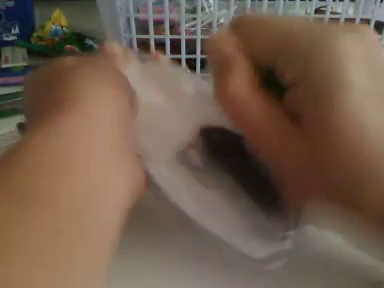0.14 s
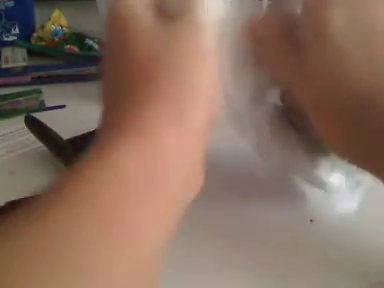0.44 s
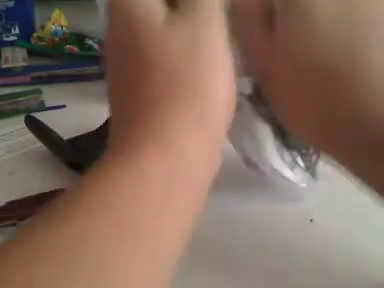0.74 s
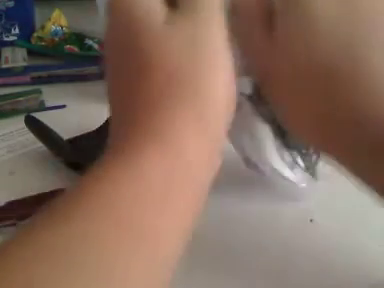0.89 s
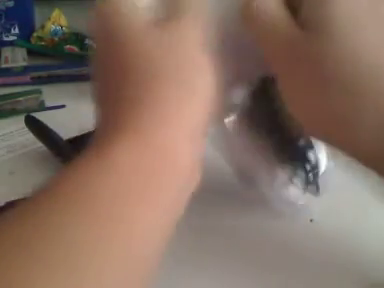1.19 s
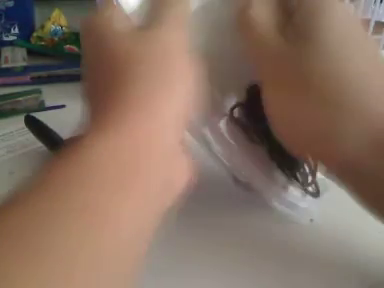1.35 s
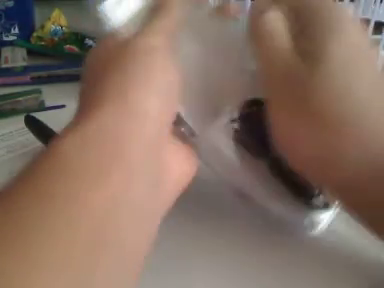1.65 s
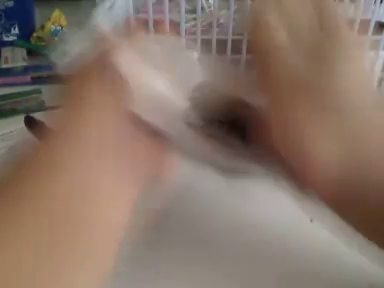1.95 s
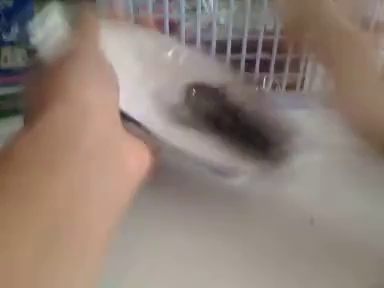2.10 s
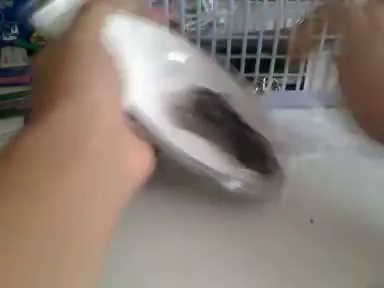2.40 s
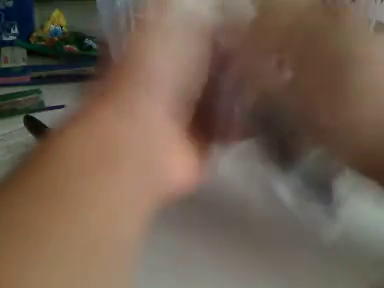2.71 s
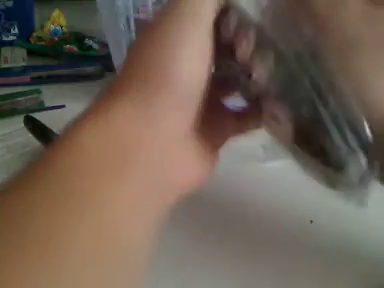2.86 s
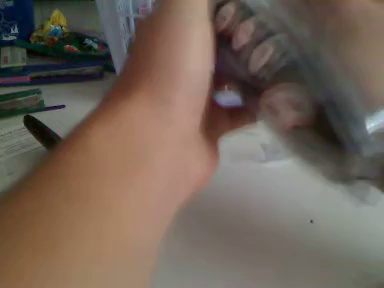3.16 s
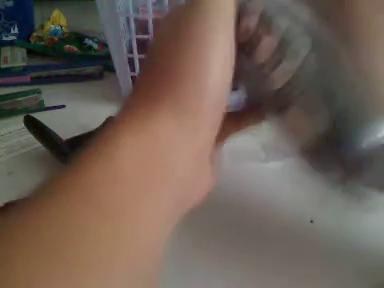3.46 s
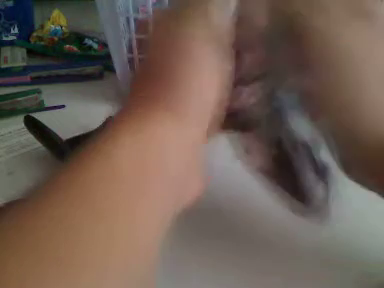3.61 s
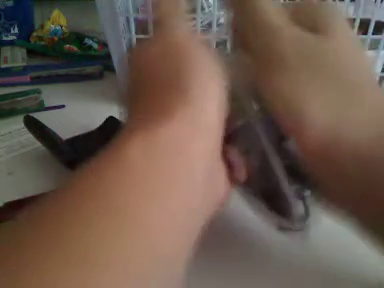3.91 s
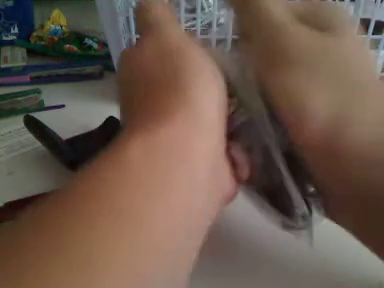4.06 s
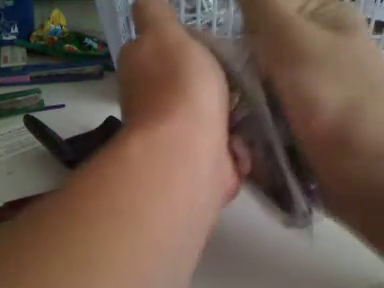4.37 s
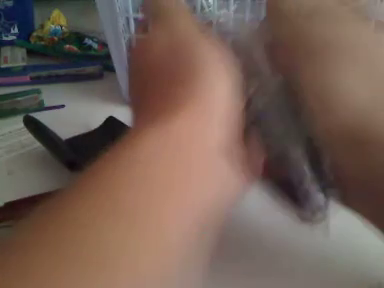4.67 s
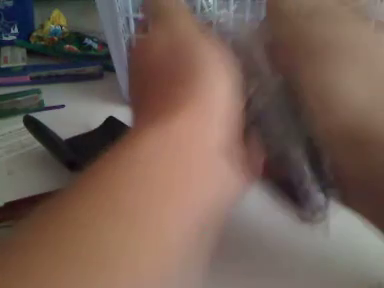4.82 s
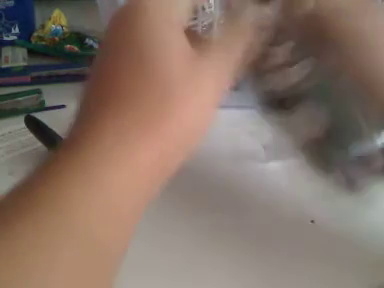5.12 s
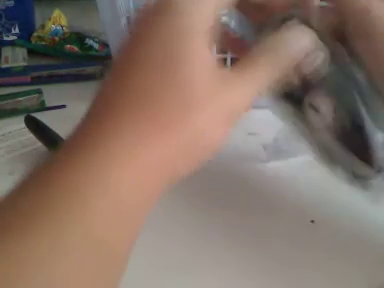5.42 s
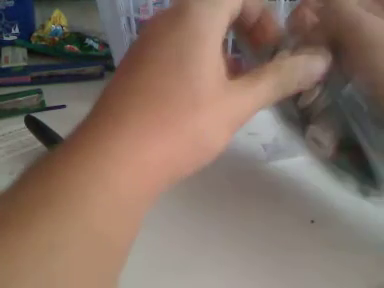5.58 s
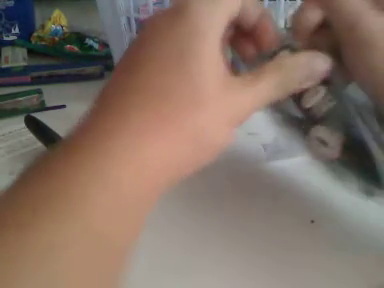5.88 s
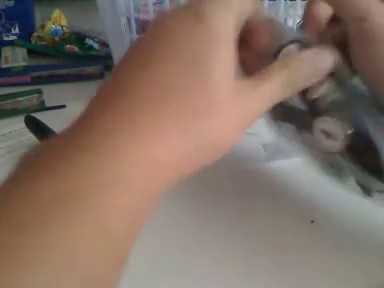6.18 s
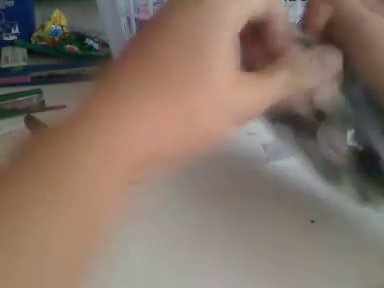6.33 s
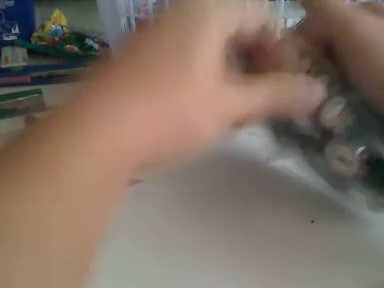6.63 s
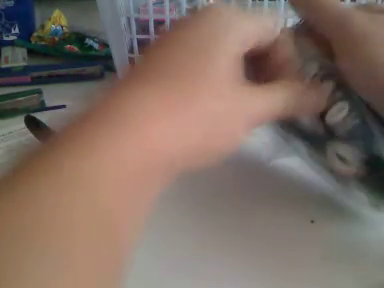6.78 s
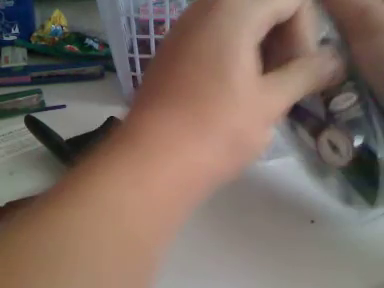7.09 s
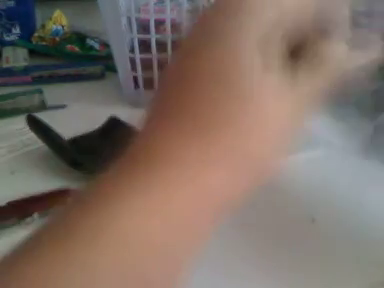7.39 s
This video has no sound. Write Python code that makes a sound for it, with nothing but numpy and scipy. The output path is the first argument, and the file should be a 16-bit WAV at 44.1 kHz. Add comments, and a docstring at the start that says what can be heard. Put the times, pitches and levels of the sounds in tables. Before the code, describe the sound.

Stiff plastic packaging is bent and pulled by hand, with sharp snaps, crinkling and rubbing fingers, close up in a small room.

```python
"""Hands bend and pull apart a stiff clear blister pack over a desk in a small room. First the sheet buckles in
a run of snaps; the hard one at 2.3 s overloads the recorder, which passes nothing above about 4 kHz. Then, for
two seconds, only creases tick, fingers rub and skid, and the plastic crinkles. From 4.5 s softer snaps join in
again, until a second hard one overloads the recorder at 7.1 s. All along, the hollow shell and the room ring
briefly, over a low rumble of the hands and a faint hiss."""
import sys
import numpy as np
from scipy import signal
from scipy.fft import rfft, irfft
from scipy.io import wavfile
from scipy.ndimage import uniform_filter1d

SR = 44100
rng = np.random.default_rng(int(sys.argv[2]) if len(sys.argv) > 2 else 0)


def bounce(signal):
    """Save signal as a 16-bit WAV file at the path given by the first command-line argument."""
    frames = np.transpose(np.atleast_2d(signal))
    limited = np.clip(frames, -1, 1)
    pcm = np.round(limited * 32767).astype(np.int16)
    wavfile.write(sys.argv[1], SR, pcm)


N = 326369

# A panel flips, jolts the hands and rings in four pitch ranges, each of which adds its own gain:
# (time [s], jolt [dB], thump [dB], panel pitch [Hz], panel [dB], rib pitch [Hz], rib [dB],
#  crease pitch [Hz], crease [dB], part sent into the room [dB])
SNAPS = [(0.2772, -64, -25, 972, -21, 1025, -27.5, 2520, -29.5, -2.5),
         (0.561, -49, -27, 500, -47, 1036, -34, 3430, -35.5, -3.5),
         (0.82, -46.5, -41, 865, -42.5, 1625, -41, 3120, -40, 1),
         (1.0913, -63, -56, 900, -52, 1070, -48, 2460, -42, -0.5),
         (1.7389, -60.5, -31, 813, -27.5, 1650, -39.5, 2850, -45, -4),
         (1.7976, -54, -48, 960, -52, 1074, -25.5, 3316, -33, -4.5),
         (2.268, -30.5, -25, 732, -11.5, 1455, -19, 2853, -20.5, -1),
         (4.5259, -63, -52.5, 513, -38.5, 1507, -42, 2380, -44, -0.5),
         (4.6423, -50, -58, 499, -37, 1453, -46.5, 2280, -38.5, 2.5),
         (5.2284, -51, -36.5, 542, -32, 1070, -32, 2100, -41.5, -1),
         (5.6424, -57, -52, 830, -40, 1120, -51, 2560, -48, -0.5),
         (6.0543, -64, -76, 876, -41.5, 1526, -46.5, 3250, -47, 0),
         (6.3357, -59.5, -51, 873, -34, 1075, -50.5, 2050, -50.5, -2.5),
         (6.7368, -60, -63, 807, -38.5, 1145, -50, 2260, -41.5, 0.5),
         (6.8096, -53.5, -35, 464, -40.5, 1560, -46, 2150, -47.5, -0.5),
         (7.0962, -34.5, -30, 605, -15.5, 1689, -23.5, 3560, -19.5, -1),
         (7.3199, -51.5, -53, 794, -32.5, 1070, -39.5, 3440, -35, -4.5)]
# The pack's four pitch ranges: thump, panel, rib and crease. A mode is one pitch it likes to ring at.
# (low edge [Hz], high edge [Hz], base fade time [s], base share of the main mode [0-1], gain [dB])
PITCH_RANGES = [(177, 450, .0022, 0.2, -2.5), (450, 1000, 0.0032, .75, 2), (1000, 1900, 0.0029, 0.5, 5.5),
                (2000, 3900, 0.0019, 0.3, 2.5)]
# Small creases give way: (time [s], base level [dB], brightness [dB])
TICKS = [(0.033, -59, -0.5), (0.139, -60, -1), (0.201, -45.5, -10), (0.25, -43, -26), (0.388, -57, -2),
         (0.442, -55.5, -2), (0.57, -38, -10), (0.816, -48.5, 2.5), (1.051, -53.5, 0), (1.238, -52.5, -24),
         (1.573, -49, -21), (1.675, -46.5, -23), (1.911, -50, -16), (2.056, -47.5, -35),
         (2.517, -55.5, -5.5), (2.757, -42.5, -3), (2.803, -52, -3), (2.867, -43.5, 9.5), (2.928, -43, 4.5),
         (3.028, -46, -5), (3.249, -53, -6.5), (3.286, -48.5, -10), (3.348, -50, -5.5), (3.39, -47.5, 1),
         (3.448, -51.5, 0), (3.479, -47, -7), (3.579, -52.5, -7), (3.693, -51.5, -14.5), (3.761, -52, -20),
         (3.983, -44, 2.5), (4.21, -53.5, -7), (4.233, -45, -1.5), (4.383, -52.5, -3), (4.486, -47, -8.5),
         (4.897, -55, 2.5), (5.104, -55, -4), (5.175, -46, 0), (5.565, -47, -13), (5.609, -46.5, -3.5),
         (5.844, -45.5, -2), (5.964, -46.5, -11), (5.995, -61, 7), (6.057, -42, -4.5), (6.17, -51, -16.5),
         (6.426, -44, -8.5), (6.522, -59.5, 15), (6.794, -48.5, -14)]
# The hands take hold, bend the sheet and let go:
# (start [s], length [s], base rub [dB], base flex [dB], base crinkle [dB], bent sheet's resonance [Hz])
MOVES = [(0.0, 0.092, -60, -61.5, -55.5, 830), (0.371, 0.13, -55.5, -56, -57.5, 920),
         (0.533, 0.093, -49, -44.5, -47, 950), (0.672, 0.35, -60, -56, -56, 1000),
         (1.076, .2, -57.5, -58.5, -56, 1130), (1.473, 0.3, -56.5, -53.5, -63, 787),
         (1.899, 0.17, -55, -52, -73, 870), (2.399, 0.14, -57, -58, -64.5, 800),
         (2.724, 0.25, -56, -54, -49, 977), (3.136, 0.069, -62.5, -60.5, -58.5, 830),
         (3.264, 0.27, -60, -58.5, -56.5, 780), (3.568, 0.069, -57.5, -57.5, -59.5, 665),
         (3.819, 0.24, -55.5, -57.5, -54.5, 820), (4.192, 0.087, -60, -53, -54, 870),
         (4.513, 0.24, -58, -59, -56.5, 570), (4.752, 0.089, -63.5, -63, -55, 682),
         (4.9, 0.16, -62.5, -77, -62.5, 596), (5.159, .17, -51.5, -52.5, -48, 635),
         (5.396, .15, -56.5, -53, -55, 780), (5.632, 0.056, -49.5, -55, -50.5, 780),
         (5.737, 0.12, -56, -54.5, -53, 620), (5.937, 0.086, -58, -54, -49.5, 685),
         (6.046, 0.11, -55, -51.5, -49, 720), (6.341, 0.19, -59.5, -54.5, -51.5, 757),
         (6.717, 0.17, -54, -53, -52.5, 680), (6.937, .13, -54.5, -54.5, -51.5, 631),
         (7.15, 0.3, -53.5, -59.5, -61, 750)]
# Tone colours of rubbing fingers, flexing sheet and fine crinkle: (frequency [Hz], relative level [dB])
RUB_COLOUR = [(60, -15.5), (130, -7.5), (300, -3.5), (460, 2.5), (600, 1), (1000, -20.5)]
FLEX_COLOUR = [(350, -21.5), (520, -11.5), (800, 6), (1000, -2), (1250, -8), (1650, -2), (2200, -24)]
CRINKLE_COLOUR = [(1100, -28), (1750, 6), (2400, 5), (3000, 0.5), (3700, -6.5), (4300, 1)]
# A finger or an edge skids along the sheet: (start [s], length [s], resonance [Hz], level [dB])
SKIDS = [(0.868, 0.063, 1120, -44), (0.878, 0.052, 2600, -49), (1.1, 0.029, 1210, -45),
         (1.147, 0.035, 1250, -51), (1.351, 0.052, 320, -55), (1.474, 0.11, 322, -54),
         (1.751, 0.023, 450, -48.5), (1.978, 0.046, 1160, -53), (2.072, 0.04, 597, -53.5),
         (3.037, 0.024, 800, -52), (3.91, 0.055, 730, -53), (3.971, 0.046, 869, -46.5),
         (5.235, 0.042, 2080, -49), (5.763, 0.074, 595, -53), (6.082, 0.04, 660, -45),
         (6.47, 0.025, 598, -48), (7.355, 0.05, 478, -52)]
# Modes of the hollow shell: (pitch [Hz], gain [dB], time to fade by 60 dB [s])
SHELL_MODES = [(489, -66.5, 0.47), (592, -63, 0.072), (718, -59, 0.072), (787, -62, .2)]
# The room's echo: (frequency [Hz], gain [dB], time to fade by 60 dB [s])
ROOM_ECHO = [(100, -12, .22), (290, -8, 0.15), (700, -13.5, 0.22), (1500, -10, 0.22), (2600, -7, 0.22),
             (4000, -8, 0.12)]
# Tone colour of the steady background: (frequency [Hz], relative level [dB])
HISS_COLOUR = [(20, -2.5), (100, -3.5), (200, -6.5), (500, -7), (1000, -9.5), (2000, -14), (3800, -18.5),
               (5000, -33.5)]


def snaps(thump_hz=320, jolt_hz=72, jolt_fade_s=.0045, size=4000):
    """Large panels buckle and jolt the hands; gives the direct sound and what reaches the room."""
    near, jolts, thrown = np.zeros((3, N))
    t = np.arange(size) / SR
    jolt = unit_energy(np.sin(2 * np.pi * jolt_hz * t) * np.exp(-t / jolt_fade_s)) * np.sqrt(.01 * SR)
    for s, jolt_db, *modes, room_db in SNAPS:
        pitches, levels = [thump_hz] + modes[1::2], modes[::2]
        add(near, s, buckle(pitches, levels, slowness=0.96, focus=0.91))
        add(jolts, s, from_db(jolt_db) * jolt)
        # the sheet's edges throw a shorter, broader crack at the walls
        add(thrown, s, from_db(room_db) * buckle(pitches, levels, slowness=0.33, focus=.55))
    # so small a sheet gives off no bass; only the jolt does
    bass_cut = signal.butter(4, 170, "high", fs=SR, output="sos")
    return signal.sosfilt(bass_cut, near) + jolts, thrown


def buckle(pitches, levels_db, slowness, focus, size=1400):
    """The sheet flips: in each range a main mode and a crowd of others swell and die in milliseconds."""
    t, out = np.arange(size) / SR, np.zeros(size)
    for hz, db, (low, high, fade, share, gain_db) in zip(pitches, levels_db, PITCH_RANGES):
        envelope = np.sqrt(t) * np.exp(-t / (fade * slowness))
        main = unit_energy(envelope * np.sin(2 * np.pi * hz * t))
        crowd = envelope * band(rng.standard_normal(2 * size), low, high)[size:]
        crowd = unit_energy(crowd - main * np.dot(crowd, main))   # take the main mode out of the crowd
        share = np.clip(share * focus, 0, 1)   # low focus: no mode stands out
        out += from_db(db + gain_db) * (np.sqrt(share) * main + np.sqrt(1 - share) * crowd)
    return out * np.sqrt(.01 * SR)   # levels are averages over 10 ms


def ringing_panels(ring_db=-14, ring_s=.25, twin_gap_hz=45, twin_db=-5.5, size=16000):
    """Each flipped panel rings on at its own pitch; a weaker mode just above makes the tone waver."""
    out, t = np.zeros(N), np.arange(size) / SR
    for s, _, _, panel_hz, panel_db, *_, room_db in SNAPS:
        tone = np.sin(2 * np.pi * panel_hz * t)
        twin = from_db(twin_db) * np.sin(2 * np.pi * (panel_hz + twin_gap_hz) * t)
        envelope = from_db(panel_db + room_db + ring_db - 60 * t / ring_s)
        add(out, s, envelope * (tone + twin))
    return out


def settling(relative_db=-17, fade_s=0.034):
    """After a snap the loosened sheet rattles briefly."""
    kicks = [(s, crease_db + room_db + relative_db) for s, *_, crease_db, room_db in SNAPS]
    rattle = band(slips(per_s=600, spread_db=2.5, clump_db=4.0, hiss=.1), 1100, 3900)
    return fading_kicks(kicks, fade_s) * steady(rms_one(rattle))


def ticks(creases, first_db=0.5, follower_db=-9.5, mean_gap_s=.007, followers=2):
    """A small crease pops and sets off a short run of weaker ones."""
    out = np.zeros(N)
    for s, db, bright_db in creases:
        bass_db = db - 10 * np.log10(1 + from_db(bright_db) ** 2)
        # thump, panel, rib, crease
        levels = bass_db + np.array([-10, -1, -6 + bright_db / 2, -2 + bright_db])
        delays = np.append(0, np.cumsum(mean_gap_s * (.5 + rng.random(followers))))
        weaker_db = follower_db - 2 * np.arange(followers) + 2 * rng.standard_normal(followers)
        for delay, strength_db in zip(delays, np.append(first_db, weaker_db)):
            pitches = [rng.uniform(low, high) for low, high, *_ in PITCH_RANGES]
            add(out, s + delay, buckle(pitches, levels + strength_db, slowness=0.81, focus=1.0))
    return out


def faint_creases(crinkle_gain, per_s=6, count=120):
    """Creases give way at random, about as loud as the crinkle around them; gives rows like TICKS."""
    times = np.cumsum(rng.exponential(1, count)) / per_s
    chance = rng.standard_normal((count, 2)).clip(-2, 2)
    return [(s, 20 * np.log10(crinkle_gain[int(s * SR)]) - 0.5 + 3 * loud, -2.5 + 6 * bright)
            for s, (loud, bright) in zip(times, chance) if s < N / SR]


def handling(rub_gain, flex_gain, crinkle_gain):
    """Fingers drag dully on the shell; the strained sheet creaks and crinkles."""
    skin = slips(per_s=160, spread_db=3.0, clump_db=4.5, hiss=0.17)
    sheet = slips(per_s=400, spread_db=4.5, clump_db=3.0, hiss=0.083)
    rub = rub_gain * from_db(-2) * steady(coloured(skin + sheet, RUB_COLOUR))
    flex = flex_gain * from_db(-0.5) * steady(strained(coloured(sheet, FLEX_COLOUR)))
    crinkle = crinkle_gain * from_db(-0.5) * steady(coloured(sheet, CRINKLE_COLOUR))
    return rub + flex + crinkle


def effort(grip_s=0.022, release_s=.035, holding_db=(-69, -72, -69.5)):
    """Gains of rub, flex and crinkle: each move swells, stays and lets go, above mere holding."""
    t = np.arange(N) / SR
    gains = np.outer(from_db(holding_db), np.ones(N))
    for s, length_s, *levels_db, _ in MOVES:
        rise, fall = (t - s) / grip_s, (s + length_s - t) / release_s
        envelope = np.clip(np.minimum(rise, fall) + .5, 0, 1)
        gains = np.maximum(gains, np.outer(from_db(levels_db), envelope))
    return gains


def strained(x, lift_db=7, width_octaves=0.41):
    """The bent sheet boosts sound near its resonance, which glides as the grip changes between moves."""
    starts, lengths, *_, hz = np.transpose(MOVES)
    grip_changes = np.sort(np.append(starts, starts + lengths))
    resonance_hz = np.interp(np.arange(N) / SR, grip_changes, np.repeat(hz, 2))
    edges, out = np.geomspace(400, 1800, 9), x
    for low, high in zip(edges, edges[1:]):
        octaves_away = np.log2(resonance_hz / np.sqrt(low * high))
        nearness = np.exp(-.5 * (octaves_away / width_octaves) ** 2)
        out = out + (from_db(lift_db) - 1) * nearness * band(x, low, high, order=1)
    return out


def skids(half_width_octaves=0.36):
    """A finger or an edge sticks and slips quickly, driving one resonance of the sheet for a moment."""
    out, ratio = np.zeros(N), 2 ** half_width_octaves
    friction = slips(per_s=1600, spread_db=3.5, clump_db=3.4, hiss=0.19)
    for s, length_s, hz, db in SKIDS:
        start, size = round(s * SR), round(length_s * SR)
        tone = band(friction[start:start + size], hz / ratio, hz * ratio, order=2)
        add(out, s, from_db(db) * rms_one(tone * signal.windows.tukey(len(tone), .5)))
    return out


def slips(per_s, spread_db, clump_db, hiss, spots=14, size=150):
    """Sticking and slipping makes clumps of tiny clicks, from spots that each ring in their own way."""
    slipping = rng.random(N) < per_s / SR
    strengths = slipping * from_db(spread_db * np.minimum(rng.exponential(1, N), 3))
    which_spot = rng.integers(0, spots, N)
    clicks, fade = np.zeros(N), np.exp(-4 * np.arange(size) / size)
    for spot in range(spots):
        click = unit_energy(fade * rng.standard_normal(size))
        clicks += signal.oaconvolve(strengths * (which_spot == spot), click)[:N]
    return (rms_one(clicks) + hiss * rng.standard_normal(N)) * from_db(clump_db * drift(99))


def shell(x):
    """The hollow shell rings on after every blow, each mode as a fading sine."""
    out = np.zeros(N)
    for hz, db, ring_s in SHELL_MODES:
        decay, turn = from_db(-60 / (ring_s * SR)), 2 * np.pi * hz / SR   # both per sample
        feedback = [1, -2 * decay * np.cos(turn), decay * decay]
        out += from_db(db) * signal.lfilter([0, np.sin(turn)], feedback, x + 1e-18)
    return out


def room(x, first_echo_s=0.0017, evenness_hz=70, size=22050):
    """Desk and shelves answer first, then a short wash of echoes dies away band by band."""
    t, echo = np.arange(size) / SR, np.zeros(size)
    hz, gain_db, fade_s = np.transpose(ROOM_ECHO)
    edges = np.geomspace(70, 5000, 11)
    onset = np.clip(t / first_echo_s - 1, 0, 1)
    for low, high in zip(edges, edges[1:]):
        band_fade_s = np.interp(np.log(low * high) / 2, np.log(hz), fade_s)
        echo += band(rng.standard_normal(size) * onset * from_db(-60 * t / band_fade_s), low, high, 2)
    # the cluttered room favours no pitch: even out the peaks, then give it its broad colour
    spectrum, bin_hz = rfft(echo), np.arange(size // 2 + 1) * SR / size
    power = uniform_filter1d(np.abs(spectrum) ** 2, int(evenness_hz * size / SR))
    even = spectrum / np.sqrt(power + power.max() / 1e4)
    colour = from_db(np.interp(np.log(bin_hz + 1), np.log(hz), gain_db))
    window = (t > first_echo_s / 2) * (t < t[-1] * .9)
    return signal.fftconvolve(x, irfft(even * colour) * window)[:N]


def rumble(level_db=-70.5, shudder_db=-29, fade_s=.6):
    """The hands rumble low all the time, and the desk shudders for a moment after a hard jolt."""
    shudder = fading_kicks([(s, jolt_db + shudder_db) for s, jolt_db, *_ in SNAPS], fade_s)
    low_noise = rms_one(band(rng.standard_normal(N), 20, 110, order=2))
    return np.hypot(from_db(level_db), shudder) * low_noise


def background(level_db=-64):
    """A faint, dull, steady hiss."""
    return from_db(level_db) * coloured(rng.standard_normal(N), HISS_COLOUR)


def from_db(db):
    """Turn decibels into a gain."""
    return 10 ** (np.asarray(db) / 20)


def rms_one(x):
    """Scale to an average (rms) level of 1."""
    return x / np.sqrt(np.mean(x ** 2) + 1e-20)


def unit_energy(x):
    """Scale so that the squares sum to 1."""
    return x / np.sqrt(np.sum(x ** 2) + 1e-20)


def steady(x, span_s=.04):
    """Even out slow swings in level, keep the grain."""
    return x / np.sqrt(np.abs(uniform_filter1d(x ** 2, int(span_s * SR))) + 1e-9)


def band(x, low_hz, high_hz, order=3):
    """Keep what lies between two frequencies."""
    return signal.sosfilt(signal.butter(order, [low_hz, high_hz], "band", fs=SR, output="sos"), x)


def coloured(x, colour, size=4096):
    """Give x a tone colour and an average level of 1."""
    hz, db = np.transpose(colour)
    bin_hz = np.arange(size // 2 + 1) * SR / size
    gain = from_db(np.interp(np.log(bin_hz + 1), np.log(hz), db))
    # fold the filter forward in time (minimum phase), so nothing sounds early
    cepstrum = irfft(np.log(gain))
    cepstrum[1:size // 2] *= 2
    cepstrum[size // 2 + 1:] = 0
    response = irfft(np.exp(rfft(cepstrum)))
    return rms_one(signal.fftconvolve(x, response)[:N])


def drift(rate_hz):
    """A smooth random wobble of size about 1."""
    width = int(SR / rate_hz)
    return rms_one(uniform_filter1d(uniform_filter1d(rng.standard_normal(N), width), width))


def fading_kicks(kicks, fade_s):
    """A gain that jumps at each (time [s], level [dB]) and then dies away."""
    pulses = np.zeros(N)
    for s, db in kicks:
        pulses[round(s * SR)] = from_db(db)
    return signal.lfilter([1], [1, -np.exp(-1 / (fade_s * SR))], pulses + 1e-18)


def add(track, s, sound):
    """Mix a sound in at s seconds."""
    at = round(s * SR)
    track[at:at + len(sound)] += sound[:max(N - at, 0)]


def scene():
    """The pack's snaps and small noises, its hollow shell, the room and the background."""
    near, thrown = snaps()
    rub_gain, flex_gain, crinkle_gain = effort()
    small_noises = skids() + handling(rub_gain, flex_gain, crinkle_gain) + settling()
    small_noises += ticks(TICKS + faint_creases(crinkle_gain))
    hiss = background()
    spreading = thrown + small_noises
    pack = near + ringing_panels() + small_noises + shell(spreading)
    return (pack + room(spreading) + rumble() + hiss)[None]


def record(dry, band_top_hz=4010, ceiling=.7, hardness=14, cutoff_hz=16300):
    """The recorder passes nothing above about 4 kHz and overloads: the hardest peaks flatten and splash into
    the treble."""
    narrow = signal.sosfilt(signal.cheby1(11, .3, band_top_hz, fs=SR, output="sos"), dry)
    clipped = narrow / (1 + np.abs(narrow / ceiling) ** (2 * hardness)) ** (.5 / hardness)
    top_cut = signal.firwin(161, cutoff_hz, window=("kaiser", 8), fs=SR)
    return np.convolve(clipped[0], top_cut, "same")[None]


dry = scene()
out = record(dry)
bounce(out)
```